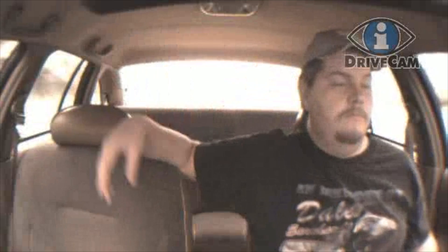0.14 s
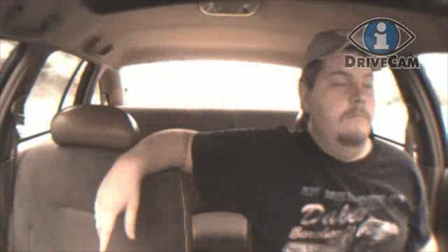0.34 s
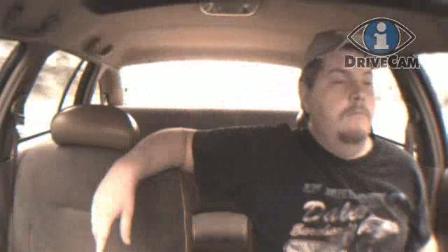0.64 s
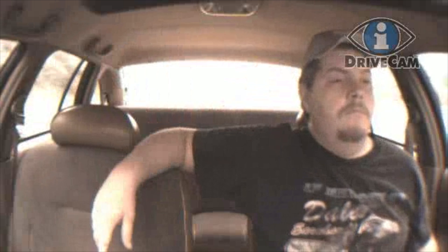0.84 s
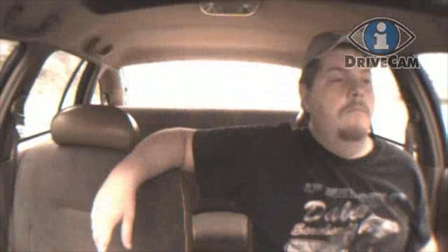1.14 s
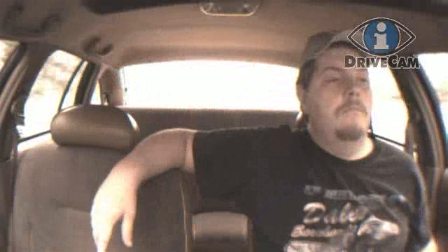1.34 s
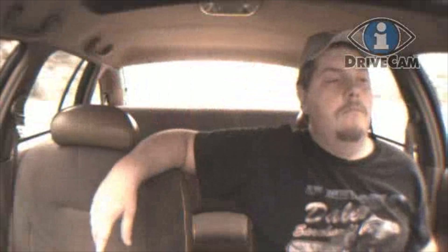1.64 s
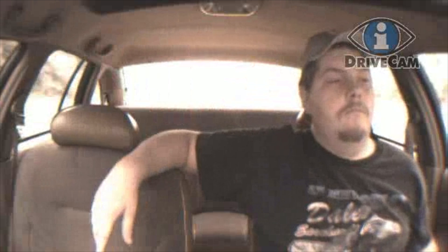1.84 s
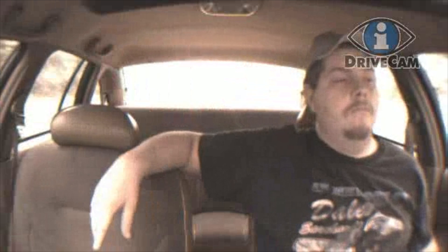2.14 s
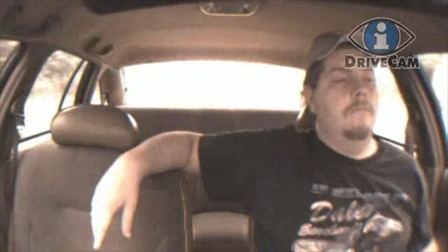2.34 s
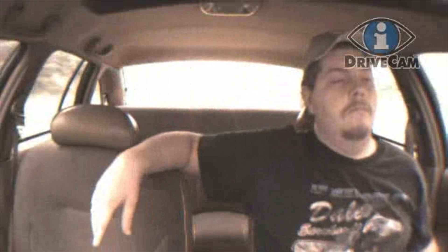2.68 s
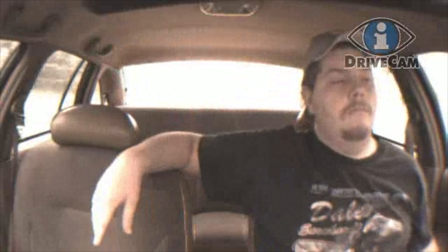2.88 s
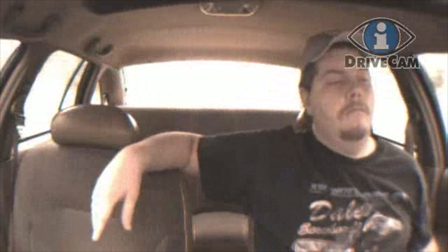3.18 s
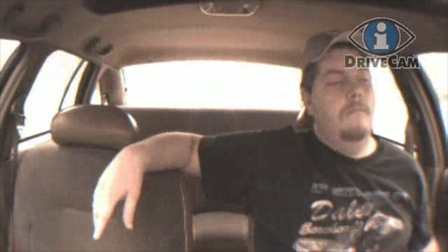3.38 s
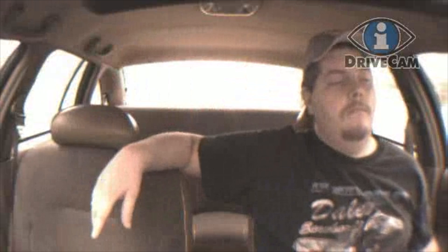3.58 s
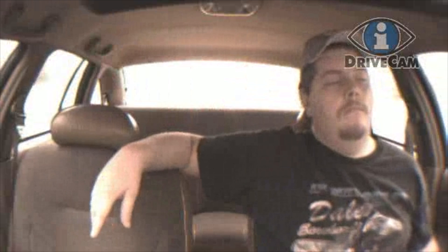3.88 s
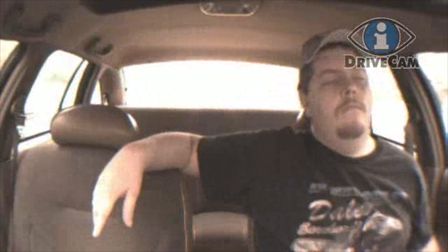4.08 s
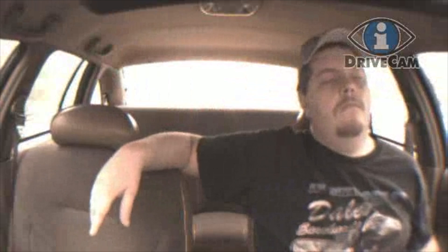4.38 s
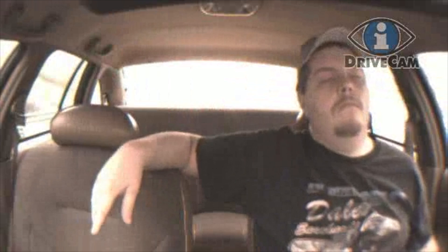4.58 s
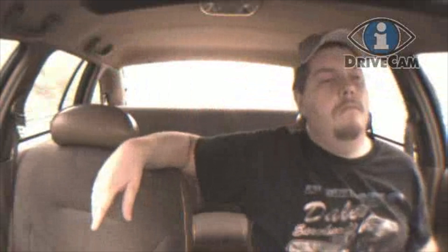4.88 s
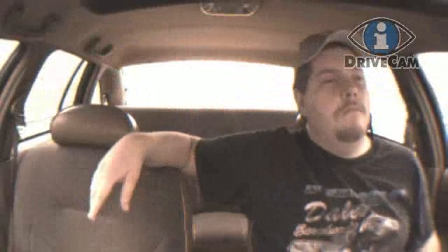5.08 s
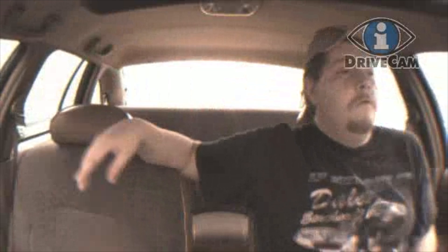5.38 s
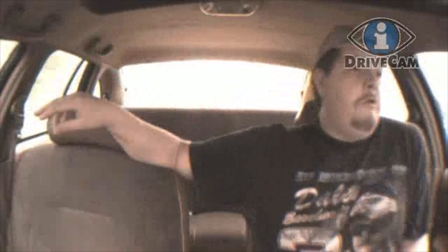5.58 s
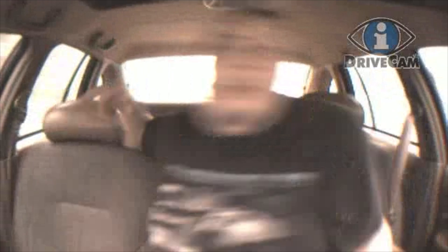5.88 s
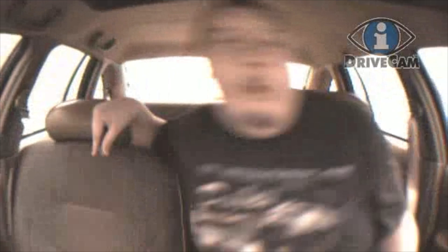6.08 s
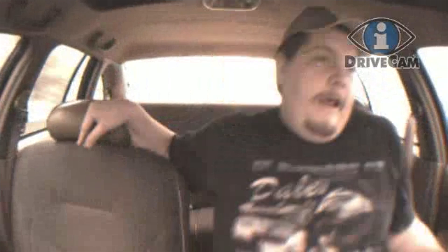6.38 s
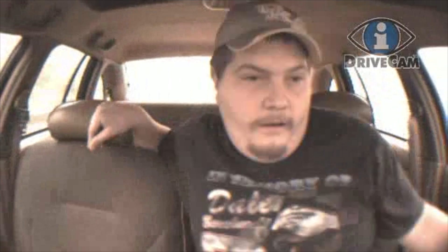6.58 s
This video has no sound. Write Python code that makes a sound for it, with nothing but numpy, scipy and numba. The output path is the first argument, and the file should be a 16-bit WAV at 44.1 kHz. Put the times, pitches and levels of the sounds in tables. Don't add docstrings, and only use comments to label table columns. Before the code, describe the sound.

Steady dull tyre roar inside a car cabin, a brief buzzing rumble-strip growl, then a violent distorted crash of crumpling metal and splintering plastic.

```python
import sys
import numpy as np
from scipy import signal
from scipy.fft import rfft, irfft
from scipy.io import wavfile
from scipy.ndimage import uniform_filter1d
from numba import njit

SR = 44100
rng = np.random.default_rng(int(sys.argv[2]) if len(sys.argv) > 2 else 0)


def bounce(signal):
    frames = np.transpose(np.atleast_2d(signal))
    limited = np.clip(frames, -1, 1)
    pcm = np.round(limited * 32767).astype(np.int16)
    wavfile.write(sys.argv[1], SR, pcm)


def level_to_linear(level):
    exponent = np.asarray(level, float) / 20
    return 10 ** exponent


N = 296793
T = np.arange(N) / SR


def rms1(x):
    return x / np.sqrt(np.mean(x ** 2))


@njit
def moving_band(x, centre_hz, width_hz):
    y, band_state, low_state = np.empty(len(x)), 0., 0.
    for i in range(len(x)):
        g = np.tan(np.pi * centre_hz[i] / SR)
        damping = width_hz / centre_hz[i]
        v = (band_state + g * (x[i] - low_state)) / (1 + g * (g + damping))
        band_state = 2 * v - band_state
        low_state += 2 * g * v
        y[i] = damping * v
    return y


def band(x, hz, width_hz):
    return signal.lfilter(*signal.iirpeak(hz, hz / width_hz, SR), x)


def body(x, modes):
    out = 0
    for k, (hz, width_hz, db) in enumerate(modes):
        out = out + (-1) ** k * level_to_linear(db) * rms1(band(x, hz, width_hz))
    return rms1(out)


def steep(x, hz, kind):
    return signal.sosfilt(signal.ellip(12, .2, 80, hz, kind, fs=SR, output="sos"), x)


def walk(rate_hz):
    k = int(SR / rate_hz)
    held = np.repeat(rng.standard_normal(N // k + 1), k)
    return 1.1 * uniform_filter1d(uniform_filter1d(held, k), k)[:N]


def grains(rate_hz, spread_db):
    size_db = spread_db * np.minimum(rng.exponential(size=N), 3)
    return (rng.random(N) < rate_hz / SR) * level_to_linear(size_db) * rng.choice([-1, 1], N)


def add(out, s, sound):
    i = int(s * SR)
    out[i:i + len(sound)] += sound[:N - i]


def ring(hz, t60_s, crackle_share):
    t = T[:SR // 5]
    noise = rng.standard_normal(len(t))
    crackle = rms1(band(band(noise, 2300, 2600), 2300, 2600))
    fade = np.exp(-np.log(1000) * t / t60_s)
    return fade * ((1 - crackle_share) * np.sin(2 * np.pi * hz * t) + crackle_share * fade * crackle)


def surge(s, attack_s, hold_s, fade_db_per_s):
    rise = np.clip((T - s) / attack_s, 0, 1)
    return rise * level_to_linear(-fade_db_per_s * np.maximum(T - s - attack_s - hold_s, 0))


# f/Hz, density/dB per Hz
ROAR = [(16, -40), (28, -1.5), (54, -2.5), (87, -2), (185, 1), (222, -9.5), (256, 1), (314, -1),
        (653, -7.5), (851, -1), (981, -7), (1060, -12.5), (1390, -19.5), (3600, -36.5), (4680, -57),
        (7920, -120)]
# f/Hz, width/Hz, level/dB
CABIN_MODES = [(262, 20, -15), (375.6, 13, -19), (835.7, 6.8, -14), (883, 21, -17.5), (1053, 13, -14.5),
               (1207, 11, -20.5), (1575, 110, -24)]
# t/s, peak/dB, ring f/Hz
ROAD_JOINTS = [
    (1.029, -23, 237),
    (4.659, -13, 770),
    (4.995, -9, 710),
    (5.011, -8, 830),
    (5.019, -16, 824),
    (5.087, -18, 202),
    (5.094, -12, 299),
    (5.1, -10, 248),
]
ROAR_DB = -26
SHOULDER_S, SHOULDER_DB = 4.6, 1.35
VERGE_S, VERGE_DB_PER_S = 5.85, 12


def road():
    swell = walk(2.5)
    colour_hz, colour_db = np.transpose(ROAR)
    grit = 0.42 * grains(900, 2.1)
    tread = rms1(rng.standard_normal(N) + grit)
    out = 0
    for hz in 25 * 2 ** np.arange(0, 7.4, 1 / 3):
        db = np.interp(np.log(hz), np.log(colour_hz), colour_db) + 10 * np.log10(hz)
        db = db + 0.32 * swell + 0.85 * walk(9)
        noise = rng.standard_normal(N) + grit
        out = out + level_to_linear(db) * rms1(band(band(noise, hz, hz / 2.13), hz, hz / 2.38))
    out = rms1(out)
    for hz, width_hz, db in CABIN_MODES:
        out = out + level_to_linear(db) * rms1(band(tread, hz, width_hz))
    rough_db = SHOULDER_DB * (T > SHOULDER_S) + VERGE_DB_PER_S * np.clip(T - VERGE_S, 0, .15)
    out = steep(out, 3750, "low") * level_to_linear(ROAR_DB + rough_db)
    for s, db, hz in ROAD_JOINTS:
        add(out, s, level_to_linear(db - 4.5) * ring(hz, 0.025, 0.048))
    return out


# t/s, attack/s, hold/s, tyre level/dB, axle hum level/dB
STRIP_CONTACTS = [
    (5.51, 0.047, .02, -26, -27.5),
    (5.595, 0.097, 0.19, -18, -29.5),
]
# t/s, peak/dB, ring f/Hz, t60/s
THUMPS = [
    (5.85, -1, 89.5, 0.059),
    (6.076, 1, 120.5, 0.077),
    (6.14, 2.5, 225.4, 0.072),
    (6.256, -8.5, 112, 0.14),
    (6.295, -1.5, 150, 0.091),
    (6.329, -2.5, 130.6, 0.076),
    (6.368, -8, 173, 0.087),
    (6.454, -8.5, 129.7, 0.074),
]
GROOVE_HZ, LIFT_OFF_DB_PER_S = 133.4, 423
TYRE_HZ, SQUASHED_HZ, LOAD_S, SAG_HZ_PER_S = 877, 690, 5.64, 950


def strip():
    tyre_hz = np.clip(TYRE_HZ - SAG_HZ_PER_S * (T - LOAD_S), SQUASHED_HZ, TYRE_HZ)
    cycles = np.cumsum(GROOVE_HZ * (1 + .004 * walk(40))) / SR
    slaps = np.diff(np.floor(cycles), prepend=0) * level_to_linear(1.5 * walk(130))
    push = rms1(slaps) + .85 * rng.standard_normal(N)
    tyre = push
    for _ in range(3):
        tyre = moving_band(tyre, tyre_hz, 420.)
    tyre = rms1(tyre) + level_to_linear(-16) * rms1(band(band(push, 1240, 150), 1210, 150))
    tones = np.sin(2 * np.pi * cycles) + np.sin(4 * np.pi * cycles + 1)
    hum = level_to_linear(2.2 * walk(30)) * tones
    out = np.zeros(N)
    for s, attack_s, hold_s, tyre_db, hum_db in STRIP_CONTACTS:
        contact = surge(s, attack_s, hold_s, LIFT_OFF_DB_PER_S)
        out += contact * (level_to_linear(tyre_db) * tyre + level_to_linear(hum_db) * hum)
    soft_start = np.minimum(T[:SR // 5] / 0.011, 1)
    for s, db, hz, t60_s in THUMPS:
        add(out, s, level_to_linear(db + 4.5) * soft_start * ring(hz, t60_s, 0.14))
    return out


# t/s, hold/s, crumple/dB, boom/dB, splinter/dB
IMPACTS = [
    (6.071, .14, 2.5, -1.5, -3),
    (6.232, .01, -7.5, -6, -9),
    (6.279, 0.029, -8, -4.5, -13.5),
    (6.328, .01, -12, -11, -19.5),
]
# t/s, hold/s, crumple/dB, boom/dB, splinter/dB
LOOSE_PARTS = [
    (6.362, 0.0071, -14.5, -22.5, -23),
    (6.45, 0.017, -9, -24.5, -18.5),
    (6.486, 0.017, -14.5, -36, -29.5),
    (6.52, 0.027, -12.5, -28, -13.5),
    (6.575, .015, -13, -24, -20.5),
    (6.598, 0.0062, -9.5, -27, -13.5),
    (6.618, .02, -13, -22, -20),
]
# crumple/dB, boom/dB, splinter/dB
SLIDE_LEVEL_DB = (-19, -47.5, -27.5)
FADE_RATIO = (0.94, 0.86, 1.76)
BLOW_ATTACK_S, BLOW_FADE_DB_PER_S = 0.0075, 300
RATTLE_ATTACK_S, RATTLE_FADE_DB_PER_S = .007, 480


def force():
    ratio = np.array(FADE_RATIO)[:, None]
    slide = surge(IMPACTS[0][0], BLOW_ATTACK_S, 1, 0)
    power = (slide * level_to_linear(np.array(SLIDE_LEVEL_DB))[:, None]) ** 2
    for rows, attack_s, fade_db_per_s in (
            (IMPACTS, BLOW_ATTACK_S, BLOW_FADE_DB_PER_S),
            (LOOSE_PARTS, RATTLE_ATTACK_S, RATTLE_FADE_DB_PER_S)):
        for s, hold_s, *db in rows:
            gain = surge(s, attack_s, hold_s, fade_db_per_s * ratio)
            power = power + (gain * level_to_linear(np.array(db))[:, None]) ** 2
    return np.sqrt(power)


# f/Hz, width/Hz, level/dB
SHELL_MODES = [(45.6, 19, -4.5), (68, 30, -2), (138.6, 34, -0.5), (233.6, 76, 0)]
# f/Hz, width/Hz, level/dB
PANEL_MODES = [(337, 81, 2), (492, 206, 4.5), (650, 238, 5.5), (950, 120, 1), (1080, 128, -1),
               (1330, 190, -3.5)]
# f/Hz, width/Hz, level/dB
TRIM_MODES = [(1530, 260, -1.5), (2280, 900, -2), (3256, 870, -2), (3430, 170, -6.5), (4660, 630, -20)]
# t/s, peak/dB, ring f/Hz, crackle share/0-1
SINGLE_CRACKS = [(6.073, -3, 1080, 0.3), (6.08, 5.5, 774, .4), (6.192, 3, 583, 0.3), (6.244, -1, 968, 0.4),
                 (6.291, 0.5, 703, .5), (6.332, -8, 1207, 0.3), (6.37, -9, 586, .36),
                 (6.425, -3, 945, 0.49), (6.455, 0, 617, 0.3), (6.461, -4.5, 690, 0.39),
                 (6.493, -18, 694, 0), (6.525, -2, 1053, 0.2), (6.535, -15, 1087, 0.3),
                 (6.544, -4, 1330, 0.2), (6.554, -9.5, 755, .6), (6.571, -10.5, 848, 0.6),
                 (6.583, -1, 618, .25), (6.603, -2.5, 1437, 0.2), (6.621, -3.5, 1137, 0.3),
                 (6.635, -4.5, 945, .55), (6.682, -20, 703, .5)]
CRACK_T60_S = 0.056


def wreck():
    crumple, boom, splinter = force()
    tearing_db = 2.0 * walk(90) * (T < 6.33)
    out = crumple * level_to_linear(tearing_db) * body(grains(2500, 3.8), PANEL_MODES)
    out += boom * body(grains(300, 3.1), SHELL_MODES)
    out += splinter * level_to_linear(0.84 * tearing_db) * body(grains(4900, 4.1), TRIM_MODES)
    for s, db, hz, crackle_share in SINGLE_CRACKS:
        add(out, s, level_to_linear(db) * ring(hz, CRACK_T60_S, crackle_share))
    return out


def scene():
    return (road() + strip() + wreck())[None]


# grid step number, lost above f/Hz
TREBLE_LOSSES = [(0, 2700), (17, 2700), (19, 2900), (20, 3200), (21, 2700), (22, 2700), (26, 3400),
                 (39, 2700), (71, 2900), (75, 2700), (79, 2900), (80, 2900), (83, 3200), (88, 2900),
                 (89, 2700), (103, 2700), (112, 2900), (114, 2700)]
FIRST_DIP_S, DIP_STEP_S, DIP_WIDTH = .278, 2048 / SR, .8


def dropouts(x):
    spectrum, hz = rfft(x), np.fft.rfftfreq(N, 1 / SR)
    frame = (T - FIRST_DIP_S) / DIP_STEP_S
    edges_hz = sorted({edge_hz for _, edge_hz in TREBLE_LOSSES}) + [SR]
    for lo, hi in zip(edges_hz, edges_hz[1:]):
        lost = 0
        for k, edge_hz in TREBLE_LOSSES:
            if edge_hz <= lo:
                lost = lost + np.cos(np.pi / 2 * np.clip(frame - k, -1, 1)) ** 2
        kept = np.round(np.clip(1 - lost, 0, 1), decimals=9) ** DIP_WIDTH
        x = x - (1 - kept) * irfft(spectrum * ((hz >= lo) & (hz < hi)), N)
    return x


def low_pass(x):
    return signal.sosfilt(signal.butter(12, 15800, fs=SR, output="sos"), x)


def record(dry):
    x = steep(np.clip(dry[0], -.91, .91), 4710, "low")
    hiss_db = 1.9 * walk(25) + 4.1 * (T > 5.6)
    hiss = rms1(band(rng.standard_normal(N), 3600, 4000)) * level_to_linear(hiss_db)
    hiss = steep(steep(hiss, 3700, "high"), 5896, "low")
    x += level_to_linear(-54.0) * hiss * (T < 6.07)
    x = np.clip(1.02 * dropouts(x) + 0.028, -1, 1)
    return low_pass(x[None])


dry = scene()
out = record(dry)
bounce(out)
```